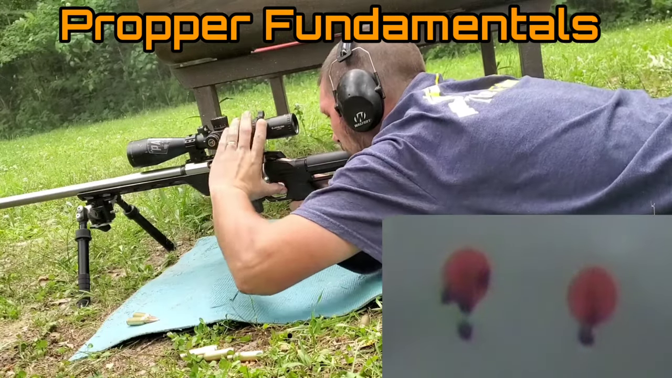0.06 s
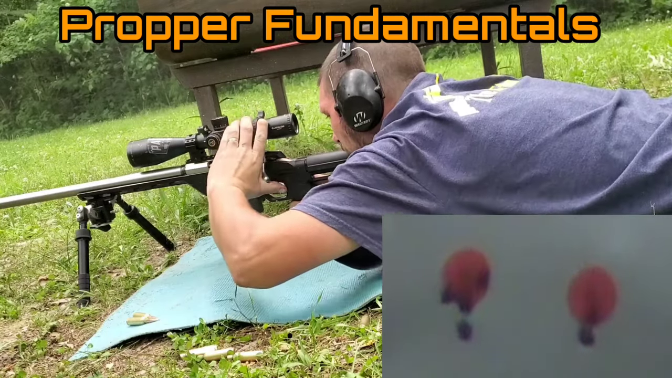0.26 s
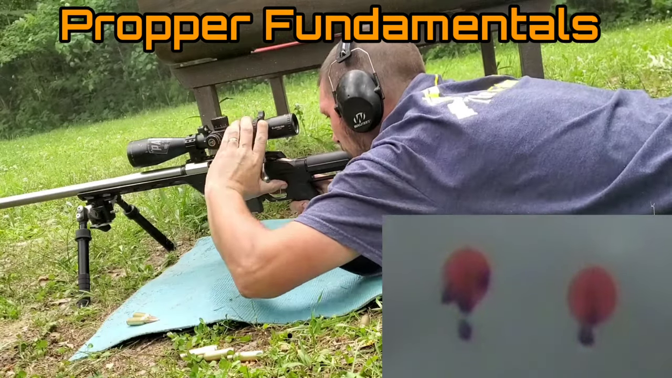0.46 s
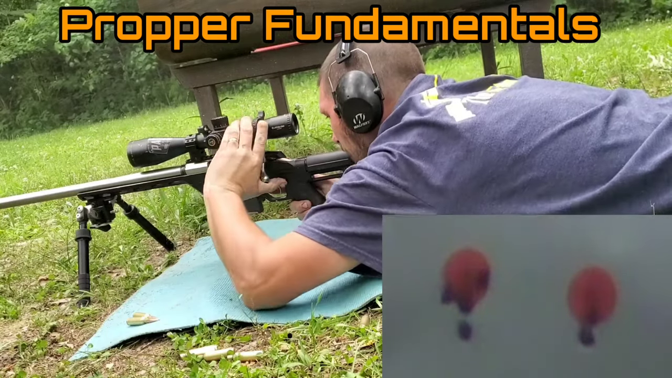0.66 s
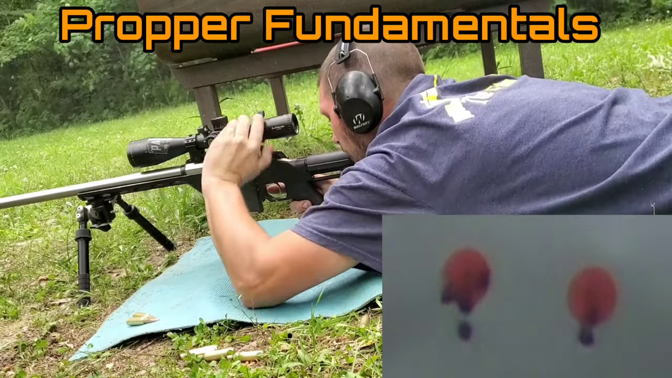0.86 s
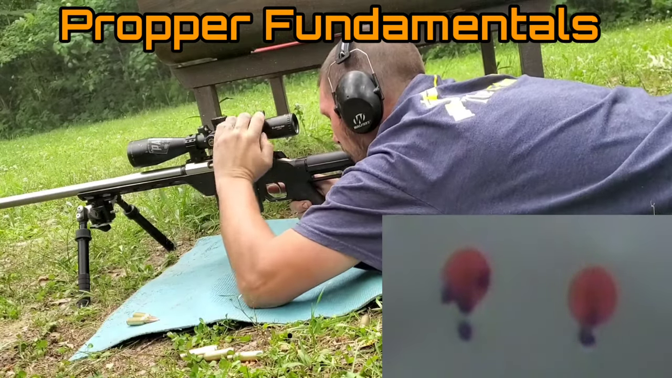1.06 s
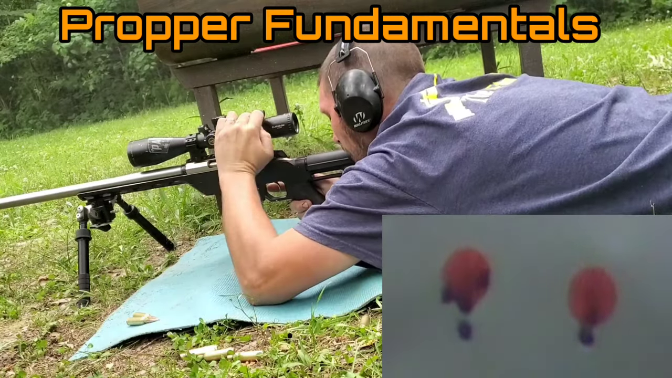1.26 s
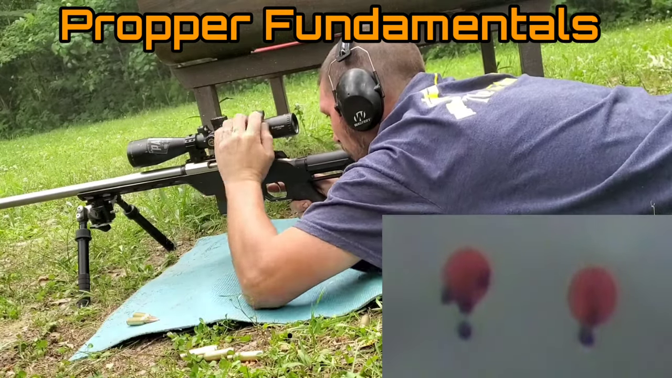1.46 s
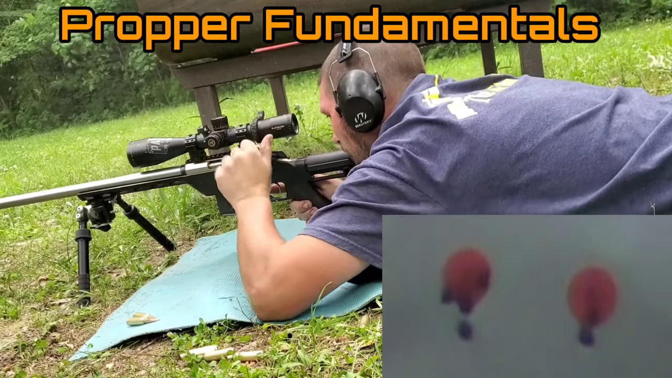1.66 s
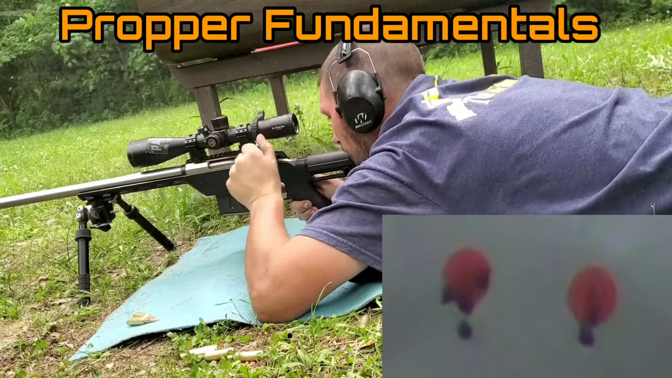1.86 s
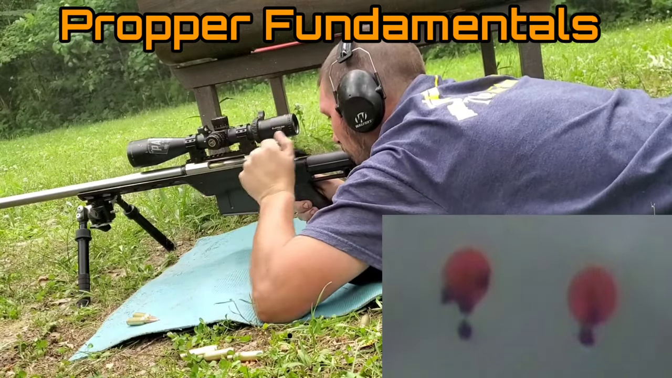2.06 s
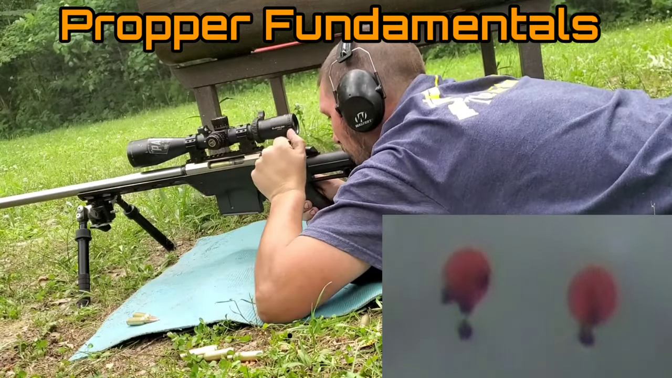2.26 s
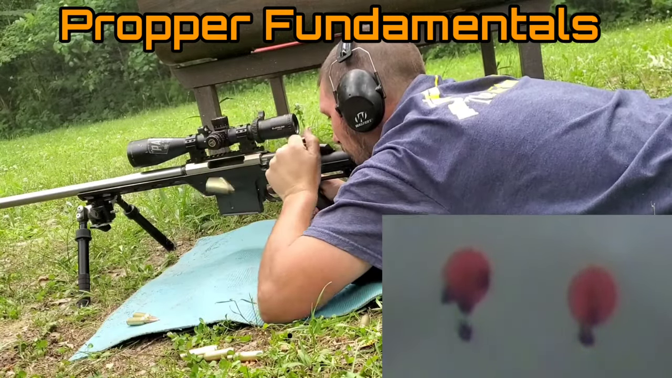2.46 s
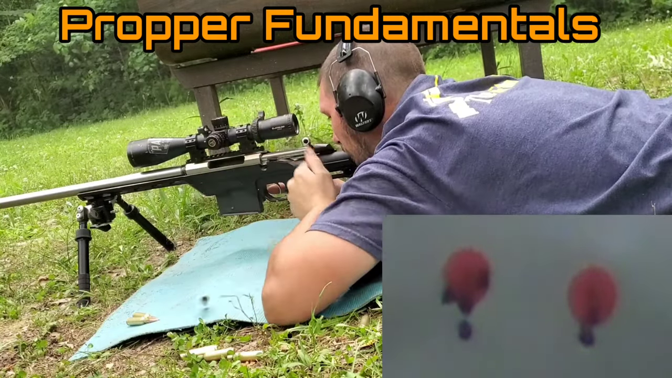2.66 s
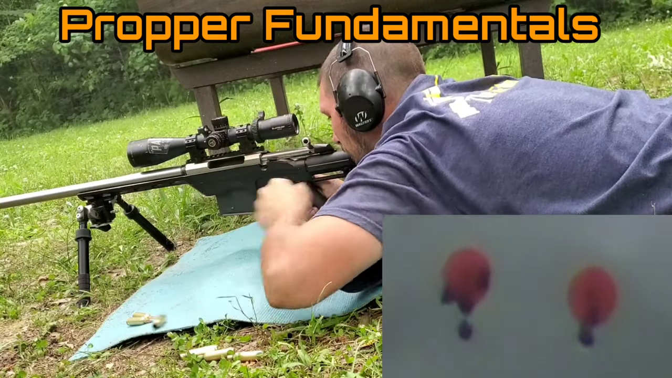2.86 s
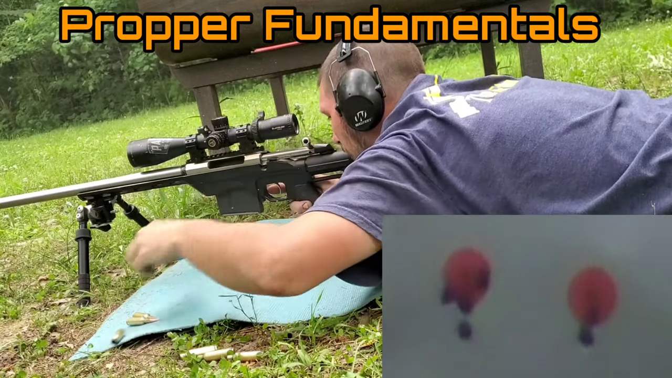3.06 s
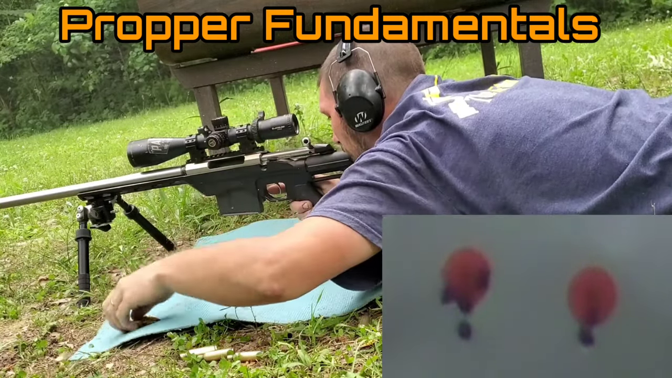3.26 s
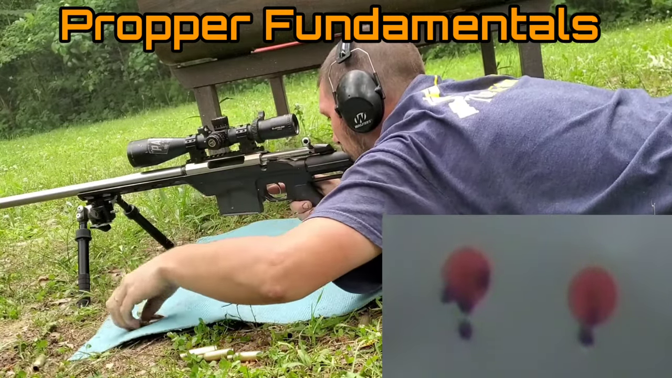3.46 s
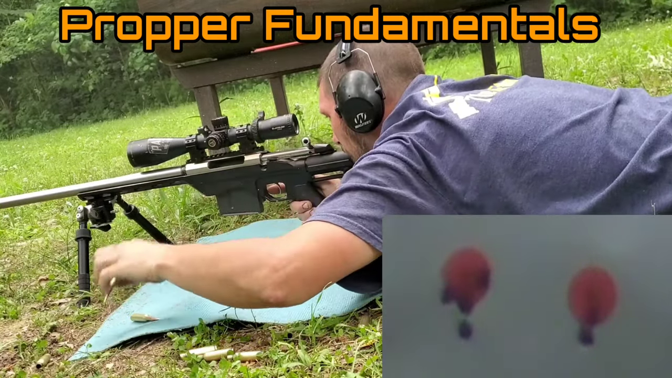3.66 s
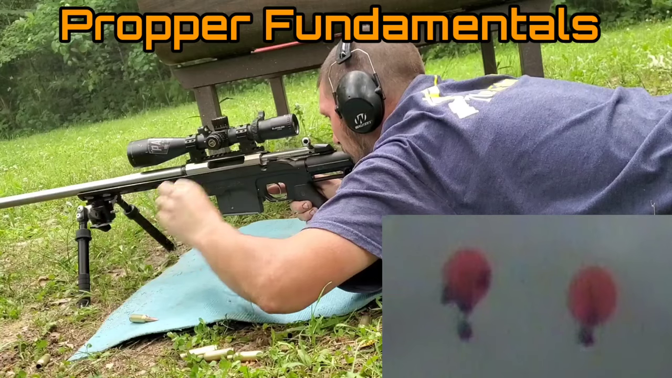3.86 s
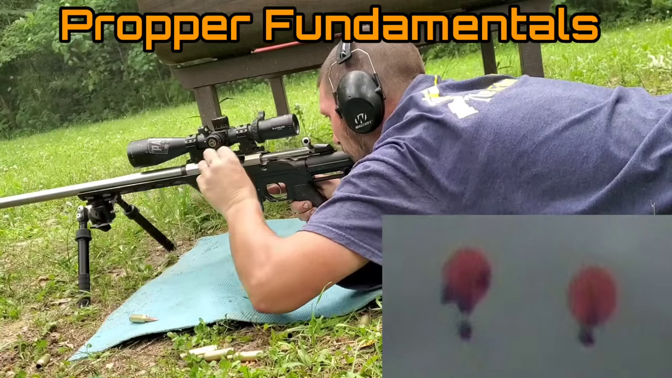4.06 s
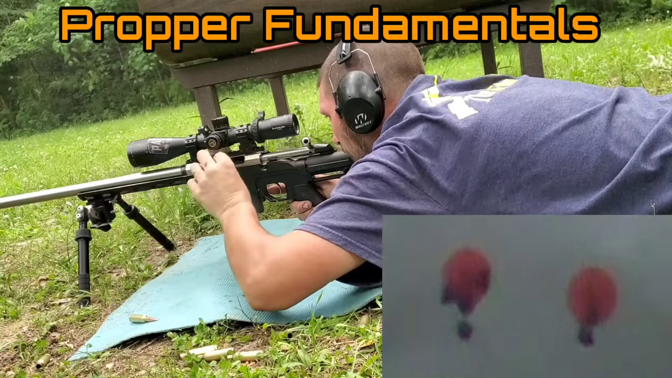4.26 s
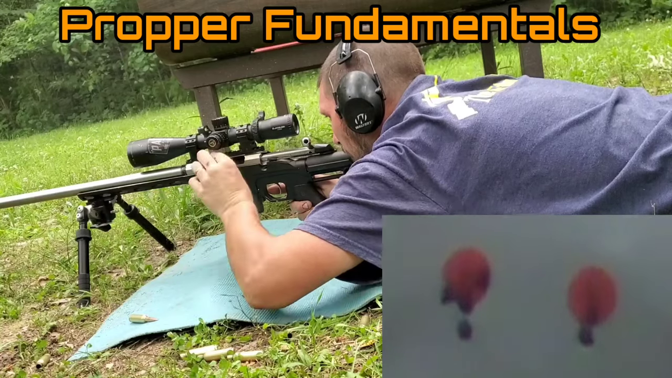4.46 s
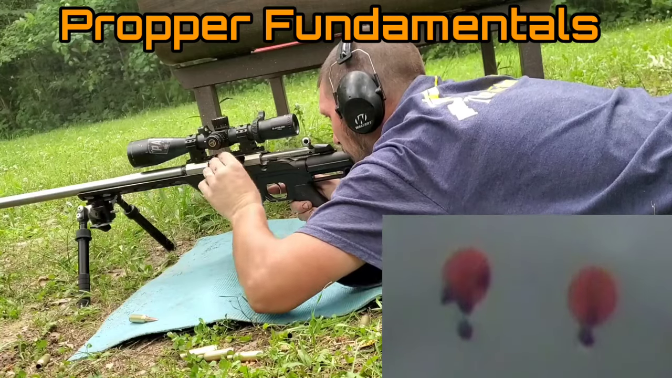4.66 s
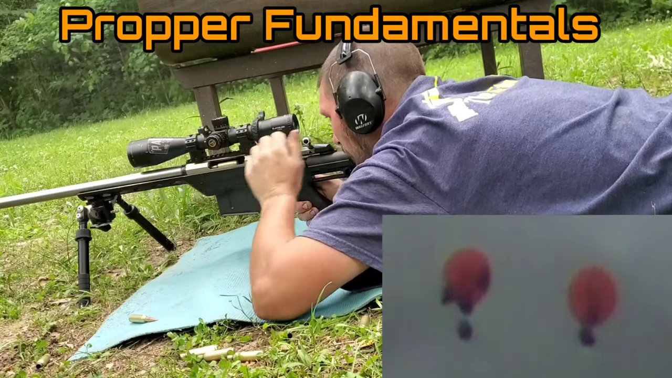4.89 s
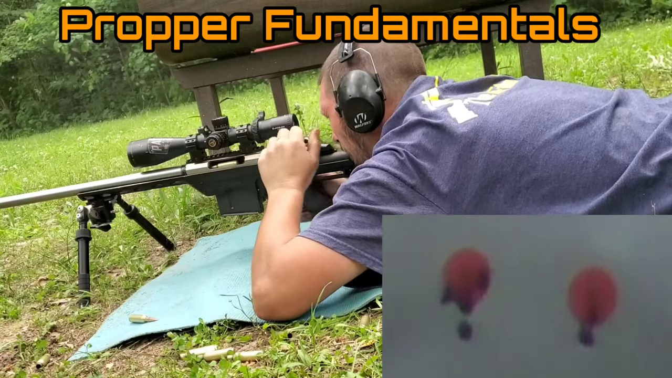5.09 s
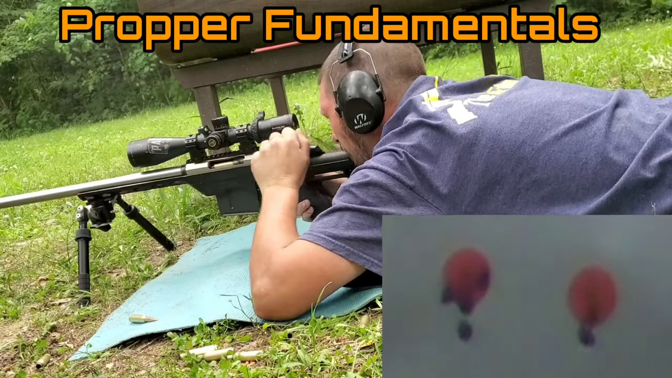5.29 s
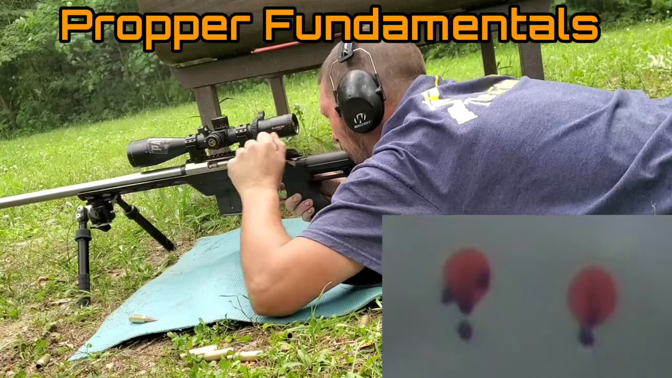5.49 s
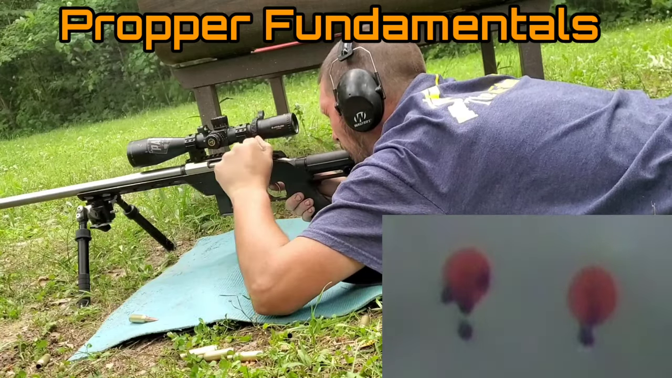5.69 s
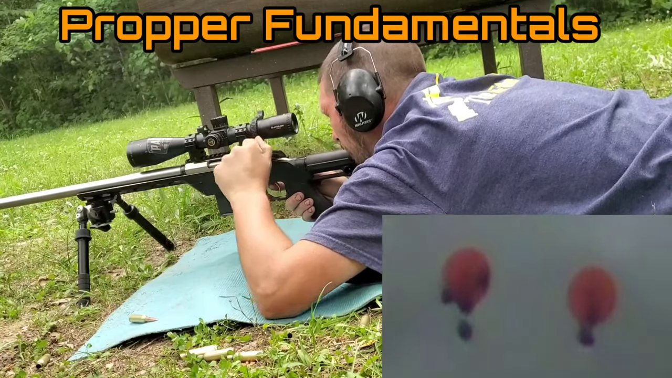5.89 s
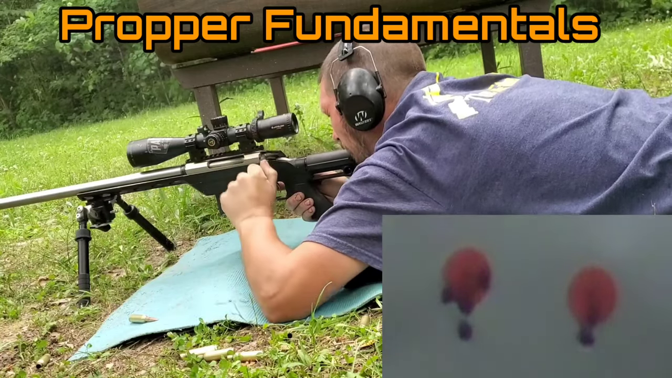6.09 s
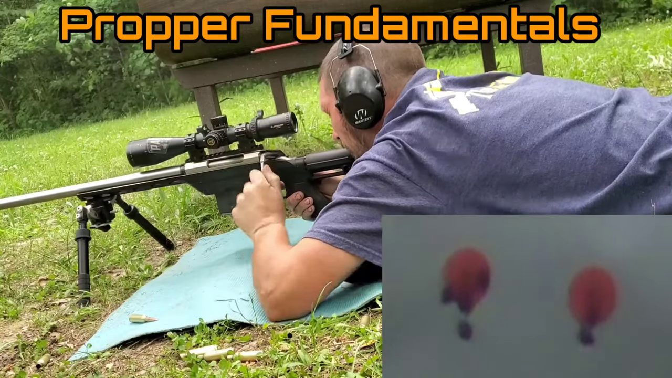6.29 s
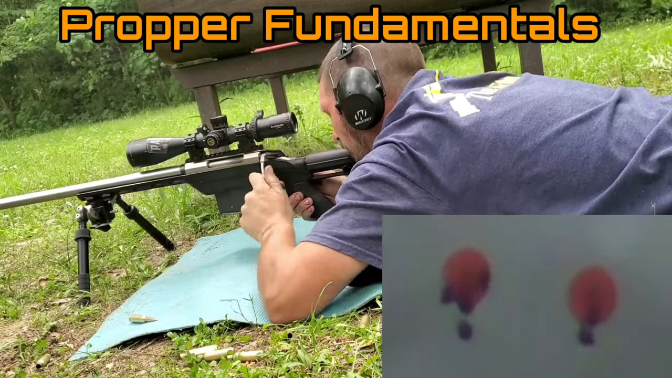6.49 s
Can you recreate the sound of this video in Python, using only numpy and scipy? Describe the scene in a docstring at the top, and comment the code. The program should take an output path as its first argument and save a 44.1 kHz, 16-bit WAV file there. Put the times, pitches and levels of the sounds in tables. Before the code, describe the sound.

Throughout, a thin, fast cricket trill near 5.5 kHz, swelling very slightly at first, rides over soft low outdoor rumble and faint leafy hiss. At about 0.9 s a sharp steel click with a small rattle comes from close by on the left, then a harder double clack at 1.3 s. From 2.1 to 2.5 s the bolt runs back in a cluster of clicks with a short brass ring from the empty case, ending in a bright snap. A dull hand bump follows at 2.7 s, then near quiet. Light nudges and tiny taps begin at 4.2 s; a fresh round clacks in at 4.7 s. More ticks and brass taps come at 5.4-5.6 s, a strong closing clack at 5.75 s, and smaller clicks at 6.1 and 6.4 s. Hollow stock knocks and a faint tree-edge scatter accompany the dry, short hits.

```python
"""Crickets trill in the grass over a low outdoor rumble; then a shooter on a lawn works a bolt-action rifle.
The bolt lifts, runs back and flips out the empty case; a fresh round is laid in, pushed home and locked down.
Steel clacks are noise bursts through the resonances of the receiver, knocks are bursts through the stock.
Brass rings as decaying sines with wandering phase; crickets are pulsed whistles and a band of hiss.
Shaped noise makes the air, and a thin noise tail makes the faint answer from the edge of the wood."""
import sys
import numpy as np
from scipy import signal
from scipy.fft import rfft, irfft, next_fast_len
from scipy.io import wavfile
from scipy.ndimage import map_coordinates

SR = 44100
rng = np.random.default_rng(int(sys.argv[2]) if len(sys.argv) > 2 else 0)


def dump_mix(stems):
    """Bounce the given channels to the path in sys.argv[1] as a 16-bit WAV at rate SR."""
    frames = np.atleast_2d(stems).T  # one column per channel
    limited = np.clip(frames, -1, 1)  # hard clip at full scale
    pcm = np.round(limited * 32767).astype(np.int16)
    wavfile.write(sys.argv[1], SR, pcm)


N = 288088

# Spectrum of the outdoor air. Each row: frequency in Hz, relative density in dB.
AIR_SPECTRUM = [(20, -11.5), (60, 2), (130, -7), (250, -11.5), (700, -17.5), (1400, -20), (2300, -22.5),
                (3700, -24), (4600, -29), (7000, -32.5), (9500, -34.5), (12500, -34), (14400, -37.5),
                (14700, -56)]
# How alike the air is left and right. Each row: frequency in Hz, correlation from -1 to 1.
AIR_LIKENESS = [(60, 0.98), (130, 0.91), (290, 0.66), (640, 0.28), (1410, -0.22), (3100, 0.17),
                (6820, 0.35), (15000, 0.044)]
# Crickets, nearest first. Each row: carrier in Hz, wing strokes per second,
# level in dB before the swell, left over right in dB.
CRICKETS = [(5522, 40.8, -55, -2), (5564, 48, -61.5, 2), (5327, 38, -63.5, 1)]
# The trill swells to a steady level: start and full gain in dB, time constant in seconds.
TRILL_START_DB, TRILL_FULL_DB, TRILL_SWELL_S = -1.5, 0.53, 1

# Steel on steel as the bolt lifts, runs back, takes the round and locks. Each row: start in seconds,
# level in dB, t60 in seconds, clack in Hz, lift at the clack in dB, lift of the sizzle near 13 kHz in dB,
# knock in the stock in dB before the stock's own gain.
STEEL_CONTACTS = [ (.888, -15.5, 0.021, 3900, 8.5, -9, -38.5), (.951, -31, .02, 3400, 14, -14, -39.5),
                  (.9645, -31, 0.045, 3500, 0, -8, -48), (.9765, -21.5, 0.017, 2930, 17, -3, -44),
                  (1.3266, -12.5, 0.023, 3750, -1.5, 4, -38), (1.3388, -11, 0.028, 2950, 4.5, 0.5, -29),
                  (2.187, -27, 0.014, 3500, -5, -20, -59), (2.1945, -20.5, 0.027, 2750, 10, 23, -52),
                  (2.2138, -16, 0.037, 3500, -1, 3.5, -44.5), (2.243, -28.5, 0.033, 3500, 6, -18, -39.5),
                  (2.4436, -24.5, 0.024, 3020, 12, -15, -37.5), (2.453, -22, .022, 3500, 7, -16, -46),
                  (2.4931, -11, 0.0093, 3470, 32, -4, -41), (4.667, -27, 0.027, 3500, -1, -16, -52),
                  (4.6822, -9, 0.0045, 3380, -7, -6, -50), (4.6835, -15, 0.02, 3400, -7, -12, -44),
                  (4.701, -25, 0.072, 3500, 6, -13, -30.5), (4.715, -27, 0.023, 3530, 18, -6, -51),
                  (4.745, -29.5, 0.046, 3520, -9, -3, -42.5), (5.3995, -15, 0.0036, 2900, 11.5, -2, -55),
                  (5.492, -24.5, 0.015, 3470, 16, -2, -51), (5.53, -38, 0.02, 3500, 11, -6, -58),
                  (5.559, -33.5, .025, 3300, 11, -11, -50), (5.7385, -18.5, 0.037, 3580, 1, -16, -39),
                  (5.7599, -8.5, 0.028, 3650, 0.5, -0.5, -29), (6.1228, -23, 0.049, 3500, 1.5, 10.5, -47),
                  (6.371, -19.5, 0.02, 2680, 11, -5.5, -39.5)]
# The hand nudges the rifle between strokes. Each row: start in seconds,
# knock in the stock in dB before the stock's own gain.
NUDGES = [(2.064, -44), (2.723, -39.5), (4.166, -47), (4.501, -45), (4.792, -46.5), (5.165, -46),
          (5.332, -48), (5.576, -44)]
# Loose steel ticks with each nudge: level in dB relative to its knock, then the tick's own colour.
TICK_DB, TICK_T60_S = -0.5, 0.028
TICK_HZ, TICK_CLACK_DB, TICK_SIZZLE_DB = 3500, 5, -7
# Resonances of the receiver. Each row: frequency in Hz, width in Hz, level in dB.
RECEIVER_MODES = [(2130, 180, -18), (2860, 150, -1.5), (3580, 208, 1), (4040, 87, 1), (4310, 710, -5),
                  (5540, 560, -0.5), (6030, 210, 2), (6960, 1130, -5), (8370, 190, -0.5), (9070, 4100, -10),
                  (12000, 240, -3.5), (13600, 2300, -4.5), (14600, 370, -2.5)]
REBOUND_S, REBOUND_DB = 0.0088, -13.5  # the parts spring apart and meet once more
STEEL_PAN_DB = 11.5  # left over right

# Resonances of the stock. Each row: frequency in Hz, width in Hz, level in dB.
STOCK_MODES = [(437, 240, -13.5), (634, 138, 3.5), (721, 94, 2.5), (1097, 86, 2.5), (1280, 310, -1)]
STOCK_LAG_S = 0.00204  # the stock answers just after the steel
# A light knock in dB, its lift above 1 kHz in dB, and dB of lift lost per dB of extra force.
LIGHT_KNOCK_DB, LIGHT_LIFT_DB, DULLING = -39, 2, 0.78

# Decay at the edge of the wood. Each row: frequency in Hz, t60 in seconds.
WOOD_DECAY = [(300, 0.28), (3500, 0.11), (8000, 0.26), (14000, 0.16)]
# What its leaves scatter back. Each row: frequency in Hz, relative level in dB.
FOLIAGE = [(600, 3), (1800, 1), (3400, 1), (6000, -5), (10000, 4), (14000, -2.5)]

# The empty case is struck. Each row: start in seconds, level in dB, lift of the high modes in dB.
CASE_HITS = [(2.1944, -34, -5), (2.2185, -40, -5), (2.4432, -32.5, 4), (2.4937, -43, 5)]
# Modes of the empty case. Each row: frequency in Hz, level in dB, t60 in seconds.
CASE_MODES = [(2714, 2.5, 0.075), (9440, -9.5, 0.23), (13800, -2, 0.094), (14250, -7, .09)]
# The hand bumps the rifle as it leaves the bolt. Each row: start in seconds, level in dB.
BUMPS = [(2.722, -40.5)]
# The fresh round taps along the feed ramp. Each row: start in seconds, level in dB,
# lift of the high modes in dB.
ROUND_HITS = [(4.36, -52, -6), (4.43, -50, -6), (4.683, -34, 8), (4.7157, -35, -4), (5.3998, -26, -4),
              (5.492, -32.5, 5.5), (5.531, -51, 18), (5.56, -47.5, 25)]
# Modes of the fresh round. Each row: frequency in Hz, level in dB, t60 in seconds.
ROUND_MODES = [(3420, -3.5, .05), (4090, 4, 0.073), (11900, -21, 0.076), (12300, -5, 0.044)]
TOP_HZ = 16500  # nothing passes above this


def amp(db):
    """Decibels to amplitude."""
    return 10 ** (np.asarray(db) / 20)


def unit(x):
    """Bring a sound to rms 1."""
    return x / np.sqrt(np.mean(x ** 2) + 1e-20)


def along(points, hz):
    """Read a curve of (Hz, value) points on a log frequency axis."""
    f, v = np.transpose(points)
    return np.interp(np.log(hz + 1), np.log(f + 1), v)


def wobble(rate):
    """A smooth random curve with rate knots a second."""
    knots = rng.standard_normal(int(N * rate / SR) + 4)
    return map_coordinates(knots, [np.arange(N) * rate / SR])


def filtered(x, response):
    """Shape a sound by a complex response of frequency."""
    n = x.shape[-1]
    m = next_fast_len(n + SR // 10)
    return irfft(rfft(x, m) * response(np.fft.rfftfreq(m, 1 / SR)), m)[..., :n]


def resonances(modes, f):
    """Causal response of a body whose (Hz, width, dB) modes alternate in sign."""
    total = 0
    for k, (centre, width, db) in enumerate(modes):
        damping = 1j * f * width
        total = total + (-1) ** k * amp(db) * damping / (centre * centre - f * f + damping)
    return total


def add(track, s, sound):
    """Lay a stereo sound on the track at time s."""
    part = track[:, round(s * SR):][:, :sound.shape[1]]
    part += sound[:, :part.shape[1]]


def air(db):
    """Distant rumble and leaves: near mono in the bass, more diffuse higher up."""
    def mid_side(f):
        # cos^2 - sin^2 of this angle is the wanted left-right correlation
        angle = np.arccos(np.clip(along(AIR_LIKENESS, f), -1, 1)) / 2
        return amp(along(AIR_SPECTRUM, f)) * [np.cos(angle), np.sin(angle)]

    mid, side = filtered(rng.standard_normal((2, N)), mid_side)
    return amp(db) * unit(np.array([mid + side, mid - side]))


def crickets(fall_hz, octave_db, sharpness):
    """Each wing stroke is a short whistle whose pitch drops as the wings slow; the grass scatters it."""
    out, t = np.zeros((2, N)), np.arange(SR // 10) / SR
    for hz, rate, db, pan_db in CRICKETS:
        stroke = np.cumsum(rate * (1 + 0.006 * wobble(7.3))) / SR % 1  # 0 to 1 through each stroke
        force = amp(1.2 * wobble(35))
        push = force * np.sin(np.pi * stroke) ** (2 * sharpness)
        slowing = stroke ** 6
        pitch = hz - fall_hz * slowing + 25 * wobble(250)
        phase = 2 * np.pi * np.cumsum(pitch) / SR
        song = unit(push * (np.sin(phase) + amp(octave_db) * np.sin(2 * phase)))
        grass = rng.standard_normal((2, len(t))) * amp(-60 * t / 0.04)
        scattered = amp(-15) * unit(signal.fftconvolve(song[None], grass, axes=1)[:, :N])
        out += (song + scattered) * amp([[db + pan_db / 2], [db - pan_db / 2]])
    still_to_rise = np.exp(-np.arange(N) / SR / TRILL_SWELL_S)
    return out * amp(TRILL_FULL_DB + (TRILL_START_DB - TRILL_FULL_DB) * still_to_rise)


def chorus(hz, width_hz, db):
    """Far crickets merge into one narrow band of hiss."""
    band = lambda f: resonances([(hz, width_hz, 0)], f) ** 2
    return amp(db) * unit(filtered(rng.standard_normal((2, N)), band))


def chatter(t60, alike):
    """Two faces meet and rattle to rest: a stereo noise burst that builds quickly and dies in t60."""
    t = np.arange(SR // 5) / SR
    a, b = rng.standard_normal((2, len(t)))
    alike = np.clip(alike, 0, 1)
    noise = np.array([a, alike * a + np.sqrt(1 - alike ** 2) * b])
    return noise * amp(-60 * t / t60) * (1 - np.exp(-t / (0.018 * t60)))


def strike(t60, alike, response):
    """A burst through a body, with the energy of a decay that starts at rms 1."""
    x = filtered(chatter(t60, alike), response)
    decay_norm = np.sqrt(t60 * SR / (2 * np.log(1000)))
    return x / np.linalg.norm(x, axis=1, keepdims=True) * decay_norm


def blows():
    """Every contact and nudge, in the columns of STEEL_CONTACTS."""
    ticks = [(s, db + TICK_DB, TICK_T60_S, TICK_HZ, TICK_CLACK_DB, TICK_SIZZLE_DB, db) for s, db in NUDGES]
    return list(STEEL_CONTACTS) + ticks


def action(crack_db, level_db):
    """Each contact cracks and rings the receiver, then rebounds; each has its own colour."""
    out = np.zeros((2, N))
    for s, db, t60, clack_hz, clack_db, sizzle_db, _ in blows():
        colour = [(2000, 0), (clack_hz, clack_db), (4900, 0), (8500, 0), (13500, sizzle_db)]

        def body(f):
            # the bare impact is broad and flat
            crack = amp(crack_db) * 1j * f / (400 + 1j * f) / (1 + (f / 9000) ** 2)
            return (resonances(RECEIVER_MODES, f) + crack) * amp(along(colour, f))

        add(out, s, strike(t60, 0.61, body) * amp(db))
        add(out, s + REBOUND_S, strike(t60, 0.42, body) * amp(db + REBOUND_DB))
    return out * amp([[level_db], [level_db - STEEL_PAN_DB]])


def stock(t60, level_db, pan_db, alike):
    """The stock takes up the blows with a short hollow knock; light ones are bright, heavy ones dull."""
    out = np.zeros((2, N))
    for s, *_, db in blows():
        lift_db = LIGHT_LIFT_DB - DULLING * max(db - LIGHT_KNOCK_DB, 0)
        colour = [(650, 0), (1100, lift_db)]
        body = lambda f: resonances(STOCK_MODES, f) * amp(along(colour, f))
        add(out, s + STOCK_LAG_S, strike(t60, alike, body) * amp(db + level_db))
    return out * amp([[pan_db / 2], [-pan_db / 2]])


def wood_edge(x):
    """Trees scatter back a thin tail of the left channel; each frequency dies at its own speed."""
    hz, t, z = signal.stft(rng.standard_normal((2, SR // 2)), SR, nperseg=256)
    fade_db = along(FOLIAGE, hz)[:, None] - 60 * t / along(WOOD_DECAY, hz)[:, None]
    tail = signal.istft(z * amp(fade_db), SR, nperseg=256)[1]
    return signal.fftconvolve(x[:1], tail / np.linalg.norm(tail[0]), axes=1)[:, :N]


def brass(hits, modes, pan_db, blur_hz):
    """A cartridge rings on after each tap; loose contact with the steel blurs its modes."""
    out, t = np.zeros((2, N)), np.arange(SR // 2) / SR
    for s, db, high_db in hits:
        for hz, level, t60 in modes:
            # a random walk of phase spreads the mode over blur_hz
            drift = np.cumsum(rng.standard_normal(len(t))) * np.sqrt(2 * np.pi * blur_hz / SR)
            lift = along([(4500, 0), (9000, high_db)], hz)
            ring = amp(level + lift - 60 * t / t60) * np.sin(2 * np.pi * hz * t + drift)
            add(out, s, ring * amp([[db], [db - pan_db]]))
    return out


def hand(t60):
    """Soft flesh on the stock gives a dull thump through one low resonance."""
    out = np.zeros((2, N))
    for s, db in BUMPS:
        add(out, s, strike(t60, 1.0, lambda f: resonances([(118, 36, 0)], f)) * amp(db))
    return out


def scene():
    """The rifle lies to the left, so its sound reaches the right microphone a little later."""
    insects = crickets(fall_hz=1181, octave_db=-15.5, sharpness=1.86)
    insects += chorus(hz=5436, width_hz=570, db=-58.5)
    rifle = action(crack_db=-15.5, level_db=0)
    rifle += stock(t60=0.04, level_db=-0.5, pan_db=-1.5, alike=0.44)
    rifle += brass(CASE_HITS, CASE_MODES, pan_db=19, blur_hz=11.0)
    rifle += hand(t60=0.038)
    rifle += brass(ROUND_HITS, ROUND_MODES, pan_db=13.5, blur_hz=12)
    lag = 16  # samples
    rifle = np.array([rifle[0], np.roll(rifle[1], lag)])
    return air(db=-51.0) + insects + rifle + amp(-15.5) * wood_edge(rifle)


def record(dry):
    """The treble rolls off steeply at the top of the band."""
    roll_off = [(14500, 0), (15000, -4), (16400, -34)]
    return filtered(dry, lambda f: amp(along(roll_off, f)) * (f < TOP_HZ))


dry = scene()
out = record(dry)
dump_mix(out)
```